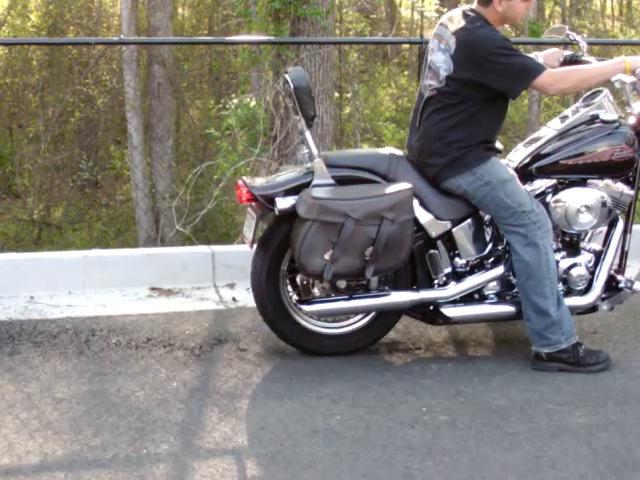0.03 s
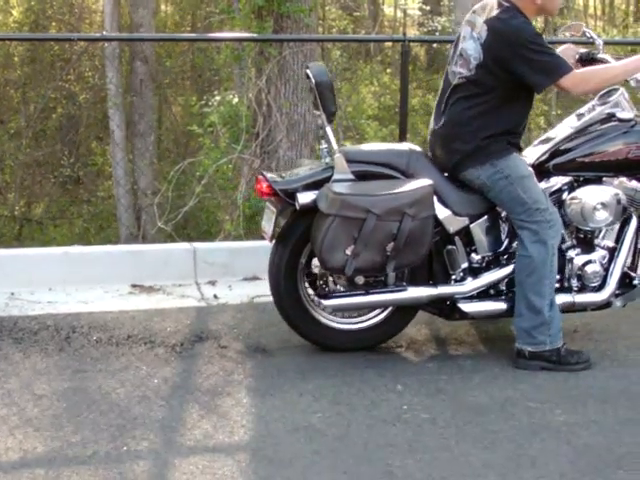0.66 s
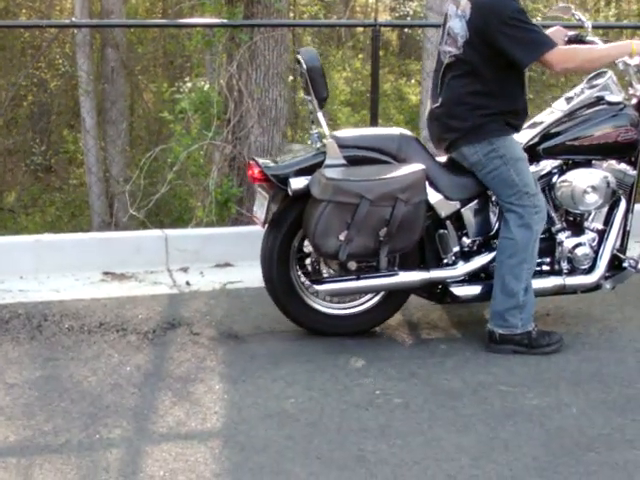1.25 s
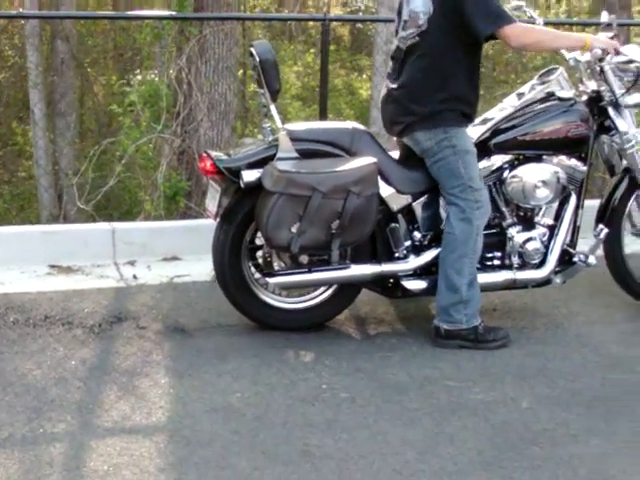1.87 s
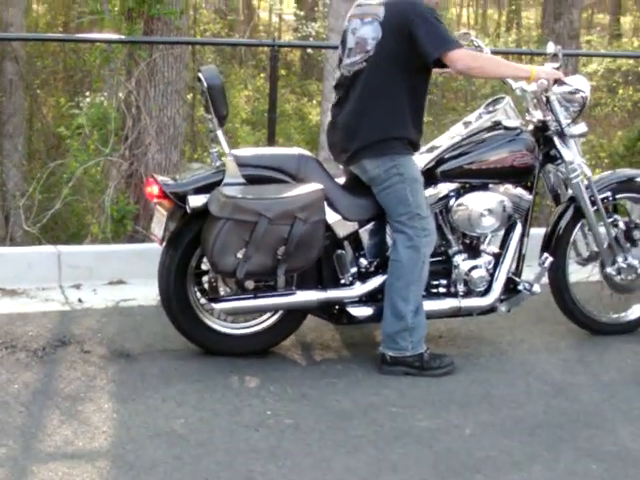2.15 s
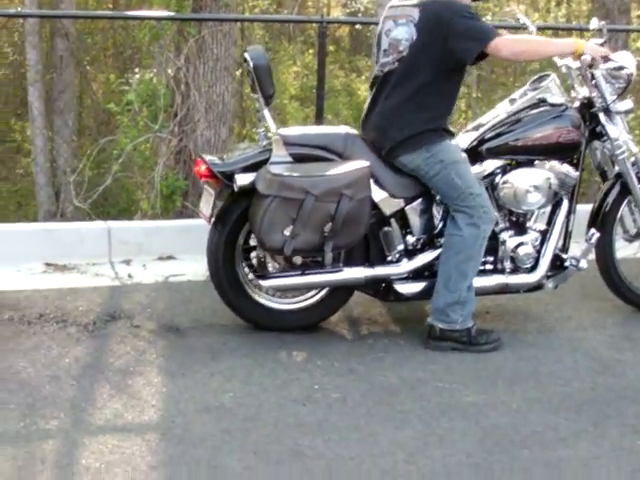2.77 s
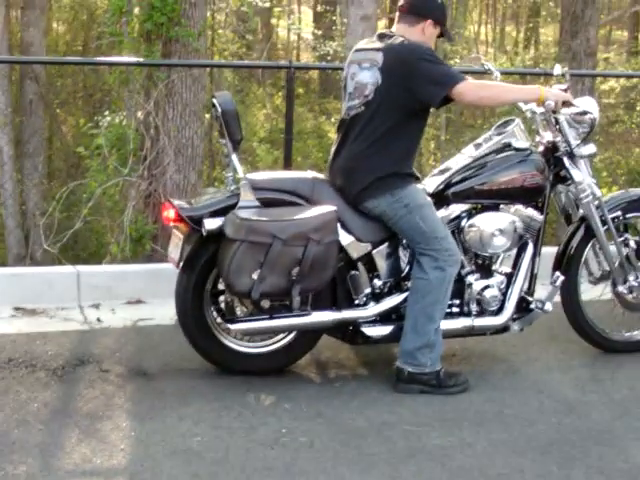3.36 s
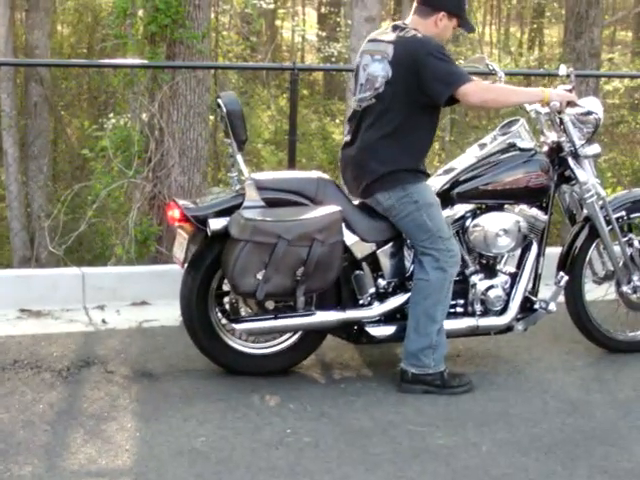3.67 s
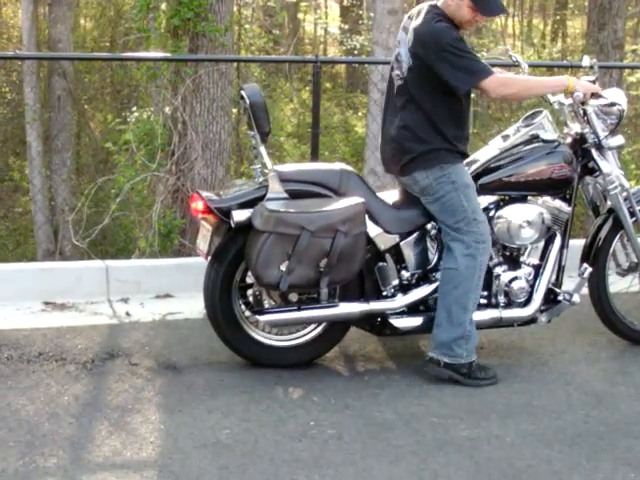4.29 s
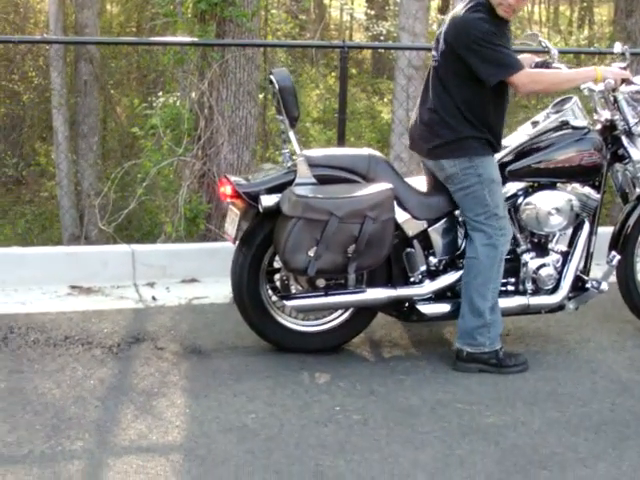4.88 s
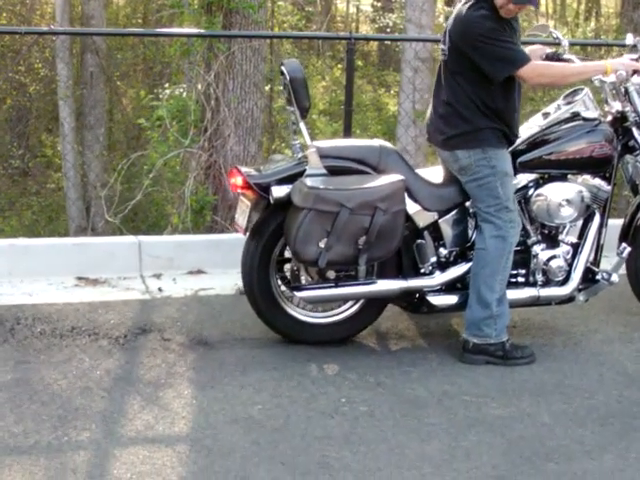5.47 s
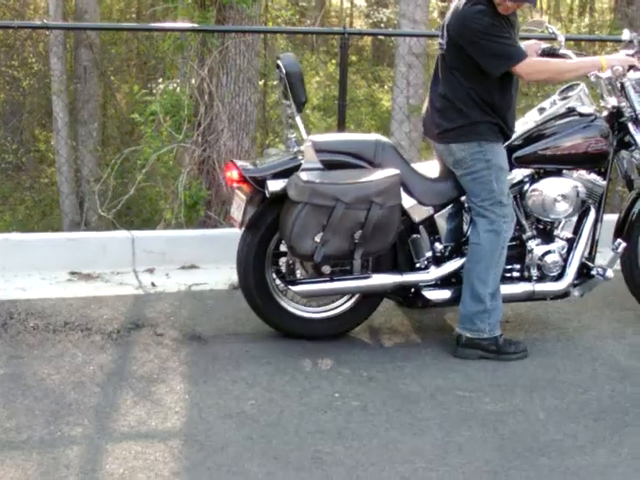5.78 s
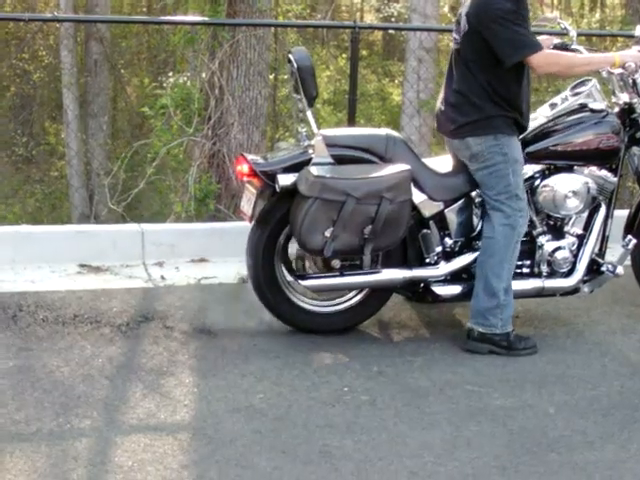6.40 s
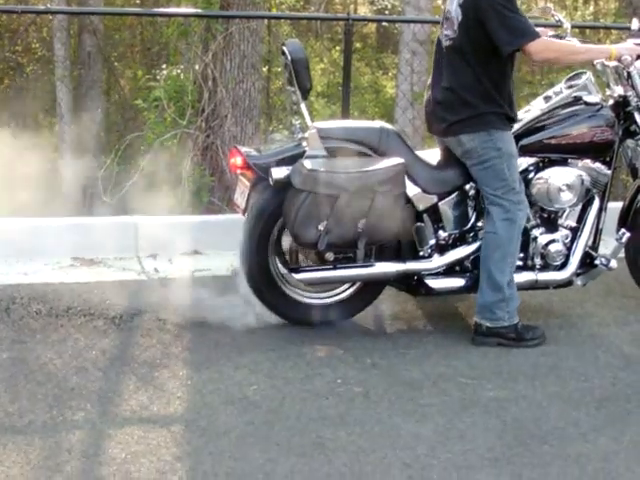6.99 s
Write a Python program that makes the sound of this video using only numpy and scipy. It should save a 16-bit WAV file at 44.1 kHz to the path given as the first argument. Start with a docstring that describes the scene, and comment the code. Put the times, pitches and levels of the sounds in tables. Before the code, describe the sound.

Outdoors, a motorcycle lopes at idle, with ticking valves, a faint thin whistle and exhaust pops that grow sharper. Then the engine roars up and down in rasping blips, straining against the brake with a few dull blasts. The rear tyre breaks loose and rubs over the asphalt under a long rising rev, which overloads the small microphone standing close by.

```python
"""A big V-twin motorcycle lopes and coughs at idle, close by at the roadside. Then it is revved against
the brake until the rear tyre spins on the asphalt. Every firing booms in the exhaust pipes and lets
out a puff of gas, over the clatter of the valve gear and a thin whistle. The small microphone stands
close: under throttle it overloads and squares off the waves."""
import sys
import numpy as np
from scipy import signal
from scipy.fft import rfft, irfft, next_fast_len
from scipy.io import wavfile
from scipy.ndimage import uniform_filter1d

SR = 44100
rng = np.random.default_rng(int(sys.argv[2]) if len(sys.argv) > 2 else 0)


def materialize(psi):
    """Save the field psi as 16-bit PCM at rate SR to the path in sys.argv[1].

    A 1-D psi becomes a single channel; in a 2-D psi each row is a channel.
    """
    bounded = np.clip(np.atleast_2d(psi).T, -1, 1)
    quanta = np.round(bounded * 32767).astype(np.int16)
    wavfile.write(sys.argv[1], SR, quanta)


N = 319284
TIME = np.arange(N) / SR
START_S = 0.035
REAR_LAG = 315 / 720  # share of a cycle by which the rear cylinder fires after the front one

# gas rasping out of the pipes under load (frequency [Hz], density [dB])
GAS_RASP = [(60, -37.5), (300, -17.5), (480, -8.5), (820, 3), (1300, -11.5), (2000, -13), (2800, -12),
            (4000, -18.5), (5500, -25.5), (8000, -37.5), (11000, -44.5)]


def revving(drone_db=6, bark_db=-9, rasp_db=-19, gas_rise_s=0.0045, leak=0.38, slip_s=(5.1, 5.5)):
    """Two cylinders fire 315 and 405 degrees apart, each barking into its pipe with a rasp of gas."""
    # engine speed (time [s], four-stroke cycle rate [Hz])
    engine_speed = [(3.2, 17.5), (3.31, 20.8), (3.36, 21.9), (3.46, 22.2), (3.69, 28.0), (3.89, 25.3),
                    (3.99, 27.1), (4.17, 32.0), (4.23, 32.3), (4.37, 28.8), (4.47, 28.3), (4.63, 30.8),
                    (4.77, 29.3), (4.97, 31.7), (5.13, 26.2), (5.27, 25.6), (5.58, 26.8), (5.9, 27.1),
                    (6.25, 30.1), (6.41, 32.5), (6.6, 34.7), (7.04, 38.7), (7.17, 39.6), (7.24, 39.6)]
    # blips against the brake, then the throttle held open (time [s], effort [dB])
    throttle = [(3.28, -30.5), (3.43, -41), (3.55, -26), (3.68, -31), (3.8, -26.5), (3.95, -31.5),
                (4.22, -30.5), (4.27, -22.5), (4.38, -23), (4.5, -32), (4.7, -33.5), (4.85, -30),
                (4.99, -32.5), (5.03, -27.5), (5.17, -34.5), (5.33, -26), (5.9, -24), (6.6, -26),
                (7.24, -23.5)]
    # each cylinder's pipe, full of hot gas (frequency [Hz], width [Hz], level [dB])
    front_pipe = [(90, 19, -35.5), (242, 34, 2), (345, 8.1, 1.5), (492.7, 38, 0.5), (774, 93, 3),
                  (883, 40, 3.5), (1207, 360, -12.5)]
    rear_pipe = [(111, 18, -6.5), (193.5, 18.6, 3), (402, 62, -3.5), (630, 16, 3), (814.4, 32, 4),
                 (988, 32, 3)]
    (speed,), (effort,) = curves(engine_speed), curves(throttle)
    effort = effort + 28  # dB above a moderate load
    spin = np.interp(TIME, slip_s, [0, 1])  # 0: the tyre grips, 1: it spins freely
    cycles = np.cumsum(speed * (TIME > 3.17)) / SR
    slowing = -np.gradient(uniform_filter1d(speed, size=3000)) * SR
    bog = np.clip(slowing / 10.4, 0, 1)  # fully bogged down when losing 10.4 Hz a second
    age = np.arange(1500) / SR
    barks, gas = np.zeros((2, N))
    for lag, pipe, pipe_db in [(0, front_pipe, 0), (REAR_LAG, rear_pipe, -4)]:
        firings = TIME[1:][np.diff(np.floor(cycles - lag)) > 0]
        pulses = np.zeros(N)
        for s, (size, late) in zip(firings, rng.standard_normal((len(firings), 2))):
            uneven = np.interp(s, [3.3, 3.9, 5.1, 5.45], [8, 4, 4, 1])  # settles as the tyre lets go
            onset = s + 2e-5 * uneven * late
            strength = np.exp(0.05 * uneven * size)
            add(pulses, onset, strength * burst(age, 0.00021))
            add(gas, onset, strength * burst(age - 0.0008, gas_rise_s))
        barks += gain_of(pipe_db) * ring(pulses, pipe)
    barks = gain_of(bark_db + effort + 1.5 * spin) * steadied(butter(barks, 55, "high"), size=5000)
    rasp = gain_of(rasp_db + 0.86 * effort + 2.5 * spin) * (gas + leak) * noise(GAS_RASP)
    hum = gain_of(drone_db + 0.49 * effort) * drone(cycles, speed, spin, bog)
    return (hum + barks + rasp) * np.interp(TIME, [3.18, 3.3], [0, 1])


def drone(cycles, speed, spin, bog, stumble_db=4.0, settled=0.3, travel_s=0.00032):
    """The strong engine orders, timed by the cylinders' uneven firing and coloured by the pipes."""
    # strong orders (frequency [multiples of the cycle rate])
    orders = (4, 5, 6, 7, 9, 10, 11, 12, 13)
    # order by order: base (level [dB]), then bogged down and with the tyre spinning (gain [dB])
    order_levels = (-9, 1.5, -2.5, -6.5, 3, -6, 0, -5.5, -6)
    bog_gains = (10.5, -6, -1, -4.5, -9, -4, -5, -9, -6)
    spin_gains = (8, 2, -1, 8, 2.5, 2, 2.5, -1, 3)
    # the pipes favour any order passing through their two low resonances (frequency [Hz], gain [dB])
    pipe_response = [(80, -18.5), (110, -14), (135, -10.5), (165, -10), (190, -13), (212, -18.5),
                     (240, -13.5), (265, -7.5), (300, -12), (355, -13), (450, -23.5)]
    hum = np.zeros(N)
    for k, db, bog_db, spin_db in zip(orders, order_levels, bog_gains, spin_gains):
        pair_phase = np.angle(1 + np.exp(-2j * np.pi * k * REAR_LAG))
        phase = 2 * np.pi * k * (cycles - speed * travel_s) + pair_phase
        stumble = stumble_db * evened(butter(rng.standard_normal(N), 38.2, "low"))
        stumble *= 1 - spin + settled * spin  # steadier once the tyre spins
        pipe_db = np.interp(k * speed, *np.transpose(pipe_response))
        height = gain_of(db + bog_db * bog + spin_db * spin + pipe_db + stumble)
        hum += height * np.cos(phase)
        if k == 9:
            # a bright overtone near 810 Hz, three times the ninth order, like the microphone's overload
            hum += ring(-height * np.cos(3 * phase), [(810, 90, -11)])
    return hum


def hard_firings(level_db=-1, rise_s=0.002):
    """Sudden, dull blasts of gas while the brake drags the engine down."""
    # hard firings (time [s], level [dB])
    firings = [(3.733, -2), (3.77, 0), (3.846, -1.5), (3.885, -3), (4.245, 0.5), (4.434, 1.5), (5.034, 1),
               (5.104, -1)]
    age, blasts = np.arange(2500) / SR, np.zeros(N)
    for s, db in firings:
        add(blasts, s, gain_of(db) * burst(age, rise_s))
    return gain_of(level_db) * blasts * butter(noise(GAS_RASP), 1800, "low")


def idle(pitch_scatter=0.094, boom_spread_db=3.5, swell_s=0.02, stroke_s=0.02, cough_db=5):
    """Each firing blows down with a puff and a crack; the piston pushes and the pipe's boom swells."""
    # the idle sinks, then gathers (time [s], boom pitch [Hz], pipe level [dB], overtone gain [dB])
    idle_course = [(0.05, 126.7, -9.5, -3), (0.4, 109.6, -10, -8.5), (0.9, 98.3, -10.5, -16),
                   (1.7, 111.2, -11, -6.5), (2.3, 106, -11.5, -8), (3.2, 109.6, -11, -3)]
    # pipe overtones with cool gas (frequency [Hz], width [Hz], level [dB])
    cool_pipe = [(160.7, 13, 20), (201.5, 11.7, 16.5), (227, 5.6, 22), (319, 10, 0)]
    # turbulence in the pipes, the puff and the crack after it (frequency [Hz], density [dB])
    rumble_colour = [(40, -35.5), (75, -31.5), (130, 6.5), (200, 0), (250, -2), (320, -6.5), (420, -29),
                     (900, -61.5)]
    puff_colour = [(100, 5), (300, 4), (440, -34.5), (540, -9.5), (610, 1.5), (700, -6.5), (950, -7.5),
                   (1250, -19.5), (1480, -14.5), (1750, -30), (3000, -24.5), (9000, -54)]
    crack_colour = [(500, -44), (1400, -24), (2100, -2.5), (2750, 10.5), (3700, -9), (5200, -5),
                    (6500, -17.5), (8500, -17), (11000, -32.5)]
    age = np.arange(6000) / SR
    glide = 2 * (age - 2 * swell_s)  # hot gas raises the pipe's note
    booms, pushes, flow, puffs, cracks, thuds = np.zeros((6, N))
    firings = idle_firings()
    note, level, overtone_db = curves(idle_course)
    for (s, crack_db, puff_db), draws in zip(firings, rng.standard_normal((len(firings), 3))):
        detune, size, late = draws
        fierce = np.clip((crack_db + 24) / 12, 0, 1)  # unburnt fuel goes off in the pipe
        cough, boom = gain_of(cough_db * fierce), gain_of(boom_spread_db * size)
        pitch = note[round(s * SR)] * (1 + glide + pitch_scatter * detune)
        piston = 0.25 * burst(age - stroke_s * (1 + 0.13 * late), 0.0022)
        add(booms, s, boom * burst(age, swell_s) * np.sin(2 * np.pi * pitch * age))
        add(flow, s, boom * burst(age, 0.026))
        add(pushes, s, boom * (burst(age, 0.0024) + piston))
        add(thuds, s, 0.065 * fierce * burst(age, 0.02) * np.sin(2 * np.pi * 260 * age))
        add(puffs, s, gain_of(puff_db) * cough * (burst(age, 0.0029) + 0.39 * burst(age, 0.012)))
        crack = burst(age - 0.0023, 0.0035) + 0.032 * burst(age, 0.002)
        add(cracks, s, gain_of(crack_db) * cough * crack)
    overtones = gain_of(overtone_db) * steadied(butter(ring(pushes, cool_pipe), 134, "high"), size=9000)
    rumble = gain_of(-9) * steadied(flow * noise(rumble_colour), size=3000)
    pipes = butter(steadied(booms, size=2400) + overtones + rumble, 73.5, "high")
    pipes *= gain_of(level) * np.interp(TIME, [3.22, 3.34], [1, 0])  # gives way to the revving
    puffs *= gain_of(8) * noise(puff_colour)
    cracks *= gain_of(-7) * noise(crack_colour)
    return pipes + thuds + puffs + cracks


def idle_firings(gap_s=0.048, soft_crack_db=-33, soft_puff_db=-30.5, spread_db=4):
    """The pops, with soft firings spaced evenly between them to keep the engine turning."""
    # firings that stand out as pops and coughs (time [s], crack level [dB], puff level [dB])
    pops = [(0.0872, -21.5, -23.5), (0.2339, -31, -26), (0.2655, -26, -26), (0.4098, -29, -26),
            (0.5303, -26, -24.5), (0.6049, -24, -20), (0.6834, -29, -24), (0.8572, -23, -21.5),
            (0.9232, -23.5, -21.5), (1.0431, -23, -20), (1.1382, -38, -25), (1.1725, -19, -18.5),
            (1.2303, -27, -23.5), (1.296, -20.5, -22), (1.3443, -17.5, -28), (1.4041, -18.5, -19.5),
            (1.4453, -18.5, -25), (1.498, -23, -22.5), (1.6962, -36, -22.5), (1.7887, -32, -21.5),
            (1.926, -37, -24), (2.0146, -21.5, -20.5), (2.1342, -20, -26), (2.1894, -15, -21),
            (2.2485, -8.5, -19), (2.2865, -12.5, -21.5), (2.5354, -28, -27), (2.638, -10.5, -19.5),
            (2.6776, -13, -19.5), (2.9323, -12.5, -24), (3.0283, -9.5, -19), (3.0729, -13.5, -14.5),
            (3.1021, -11.5, -18.5), (3.1418, -11.5, -12.5), (3.1651, -15.5, -14), (3.2219, -17, -14),
            (3.2543, -12, -14.5)]
    marks = [START_S] + [row[0] for row in pops]
    soft = [START_S]
    for start, end in zip(marks, marks[1:]):
        steps = max(round((end - start) / gap_s), 1)
        soft += list(np.linspace(start, end, steps + 1)[1:-1])
    spread = spread_db * rng.standard_normal(len(soft))
    return list(pops) + [(s, soft_crack_db + db, soft_puff_db + db) for s, db in zip(soft, spread)]


def tyre():
    """Rubber scrubs over the asphalt once the rear wheel breaks loose."""
    # the skid (time [s], level [dB])
    skid = [(5.1, -60), (5.85, -38), (6.0, -19), (6.35, -18), (6.6, -28), (7.24, -27)]
    # sliding rubber (frequency [Hz], density [dB])
    scrub_colour = [(100, -52.5), (500, 14), (850, 13), (1200, 13), (1750, -3.5), (3000, -49.5),
                    (6000, -15), (11000, -47)]
    level, = curves(skid)
    return gain_of(level) * noise(scrub_colour)


def valve_gear(clatter_db=10, metal_db=-1, ticks_per_s=160, tick_db=20):
    """Tappets, chain and gears: a broad clatter and small ticks that ring the cases and fins."""
    # loudness of the gear (time [s], level [dB])
    gear_level = [(0.06, -41), (0.51, -41.5), (0.67, -42), (0.89, -44.5), (1.11, -42.5), (3.0, -40)]
    # broad clatter (frequency [Hz], density [dB])
    clatter_colour = [(150, -53.5), (300, -4), (430, -12.5), (620, 3), (1050, -6.5), (1260, -14.5),
                      (1500, -11.5), (1750, -17.5), (2200, -18), (3600, -24), (5600, -26.5), (6700, -40),
                      (8000, -35), (11000, -34.5)]
    # resonances of the cases and fins (frequency [Hz], width [Hz], level [dB])
    case_modes = [(2770, 140, -1.5), (3340, 55, -2), (4063, 80, -3.5), (4830, 240, -11.5), (5400, 240, -16)]
    level, = curves(gear_level)
    ticks = rng.standard_normal(N) * (1 + gain_of(tick_db) * (rng.random(N) < ticks_per_s / SR))
    metal = gain_of(metal_db) * evened(ring(ticks, case_modes))
    return gain_of(level) * (gain_of(clatter_db) * noise(clatter_colour) + metal)


def whistle(hz=7700, waver_hz=16, flutter_db=3.0):
    """A faint, thin whistle high above the engine, wavering a little in pitch and level."""
    # loudness of the whistle (time [s], level [dB])
    whistle_level = [(0.05, -61), (0.6, -51.5), (2.0, -51.5), (2.4, -56)]
    level, = curves(whistle_level)
    waver, flutter = (evened(butter(z, 40, "low")) for z in rng.standard_normal((2, N)))
    phase = 2 * np.pi * np.cumsum(hz + waver_hz * waver) / SR
    return gain_of(level + flutter_db * flutter) * np.sin(phase)


def roadside(x, wet_db=-21, t60_s=0.45):
    """Kerb, fence and trees scatter a faint, dull echo back to the microphone."""
    age = np.arange(SR // 2) / SR
    taps = rng.standard_normal(len(age)) * (rng.random(len(age)) < 0.04)
    taps *= (age > 0.015) * gain_of(-60 * age / t60_s)
    tail = butter(taps / np.linalg.norm(taps), 3000, "low", order=1)
    return x + gain_of(wet_db) * signal.oaconvolve(x, tail)[:N]


def burst(age, rise_s):
    """A valve opens: pressure climbs to 1 in rise_s and drains away."""
    u = np.maximum(age, 0) / rise_s
    return (u * np.exp(1 - u)) ** 2


def ring(x, modes):
    """Sum of band-pass resonances (frequency [Hz], width [Hz], level [dB])."""
    return sum(gain_of(db) * signal.lfilter(*signal.iirpeak(hz, hz / width, SR), x)
               for hz, width, db in modes)


def noise(points):
    """Noise of rms 1, coloured by points (frequency [Hz], density [dB])."""
    point_hz, db = np.transpose(points)
    size = next_fast_len(N)
    hz = np.fft.rfftfreq(size, 1 / SR)
    colour = gain_of(np.interp(np.log(hz + 1), np.log(point_hz), db))
    return evened(irfft(rfft(rng.standard_normal(size)) * colour)[:N])


def butter(x, hz, kind, order=2):
    """Butterworth filter."""
    return signal.sosfilt(signal.butter(order, hz, kind, fs=SR, output="sos"), x)


def gain_of(db):
    """Decibels to amplitude."""
    return 10 ** (np.asarray(db) / 20)


def evened(x):
    """Scales to an rms of 1."""
    return x / np.sqrt(np.mean(x ** 2) + 1e-20)


def steadied(x, size):
    """Scales to a running rms of 1 over size samples."""
    power = uniform_filter1d(uniform_filter1d(x ** 2, size), size // 2)
    return x / np.sqrt(abs(power) + 1e-4 * np.mean(x ** 2))


def curves(rows):
    """Each value column of rows (time [s], values...) at every sample."""
    s, *columns = np.transpose(rows)
    return [np.interp(TIME, s, c) for c in columns]


def add(mix, s, sound):
    """Mixes a sound in at time s."""
    part = mix[max(round(s * SR), 0):][:len(sound)]
    part += sound[:len(part)]


def scene():
    """The motorcycle at the roadside, heard from close by in mono."""
    return roadside(idle() + revving() + hard_firings() + valve_gear() + whistle() + tyre())[None]


def record(dry, knee=8, shift=0.021, soft_hz=9000, edge_hz=11300):
    """The close microphone's input overloads, unevenly up and down; then the top treble is cut."""
    x = dry + shift * uniform_filter1d(abs(dry), size=16000)  # hard drive shifts the working point
    rail = np.where(x > 0, 0.59, 0.65)
    squared = x / (1 + abs(x / rail) ** knee) ** (1 / knee)
    fade_in = np.clip((TIME - START_S) / 0.0009, 0, 1)
    band_limit = signal.firwin(101, edge_hz, window=("kaiser", 7), fs=SR)
    return signal.oaconvolve(butter(squared * fade_in, soft_hz, "low"), band_limit[None], "same")


dry = scene()
out = record(dry)
materialize(out)
```